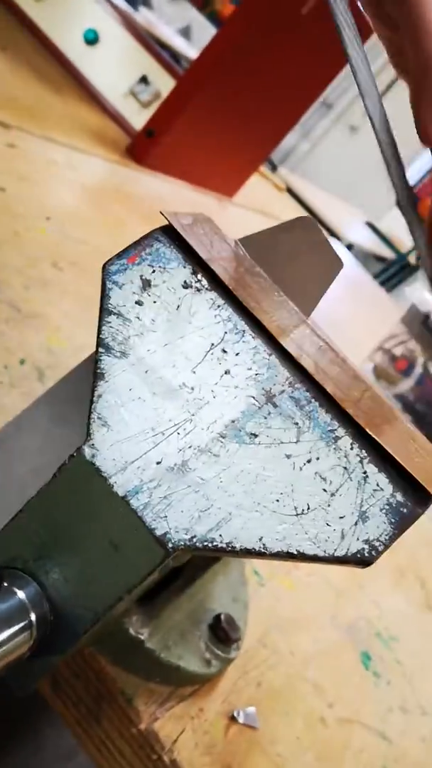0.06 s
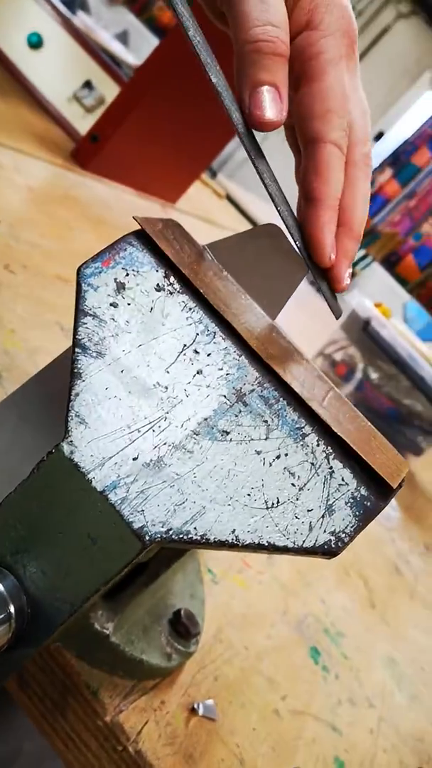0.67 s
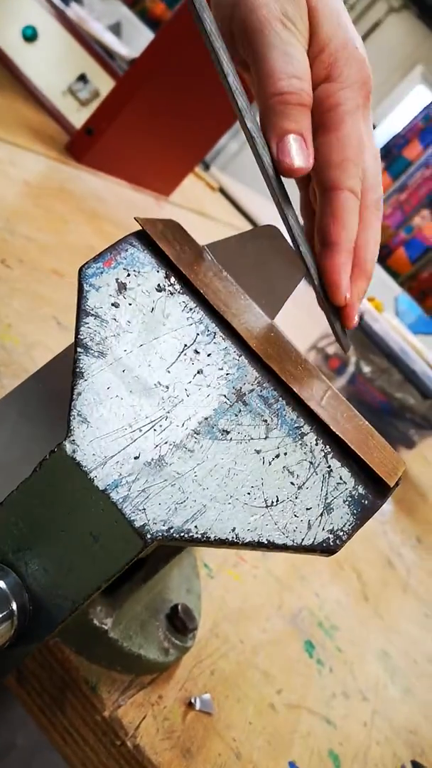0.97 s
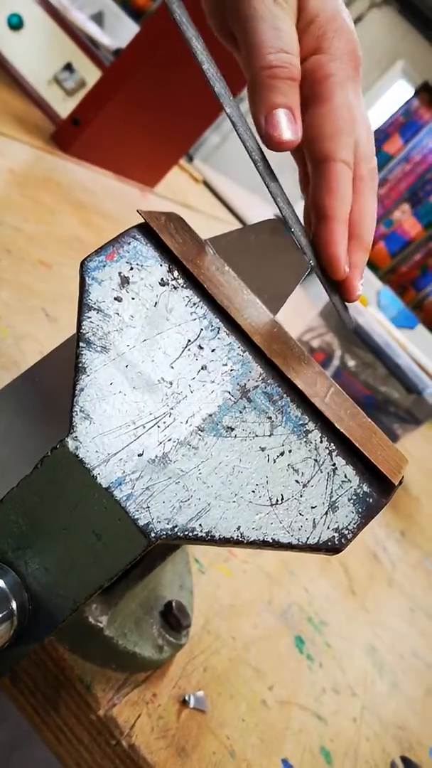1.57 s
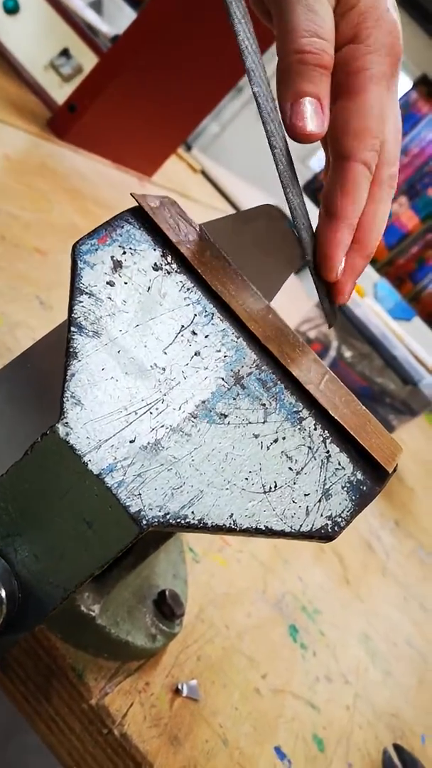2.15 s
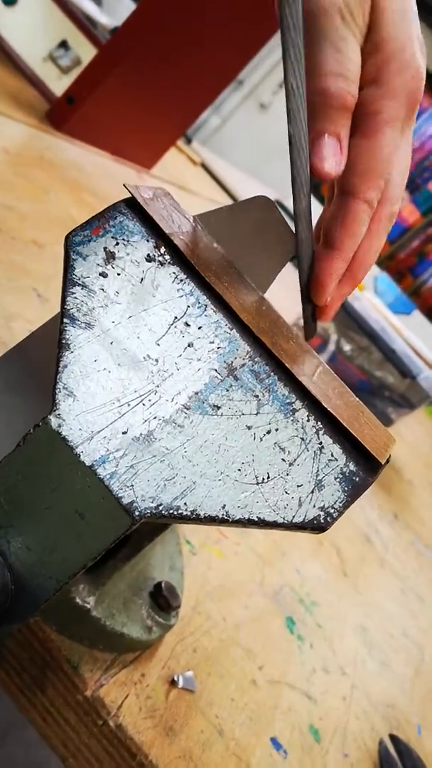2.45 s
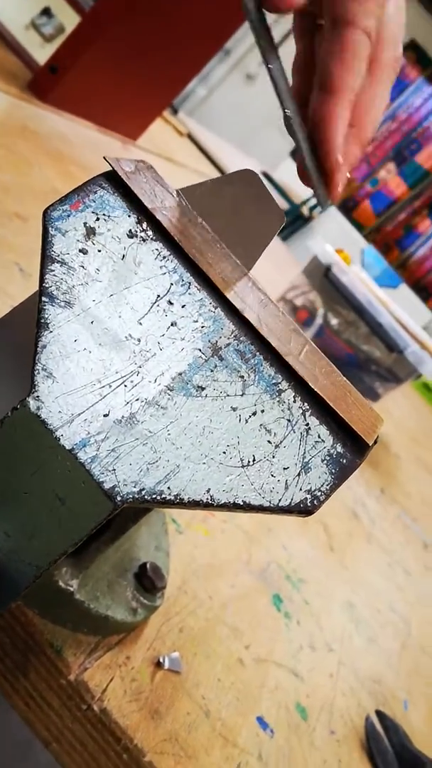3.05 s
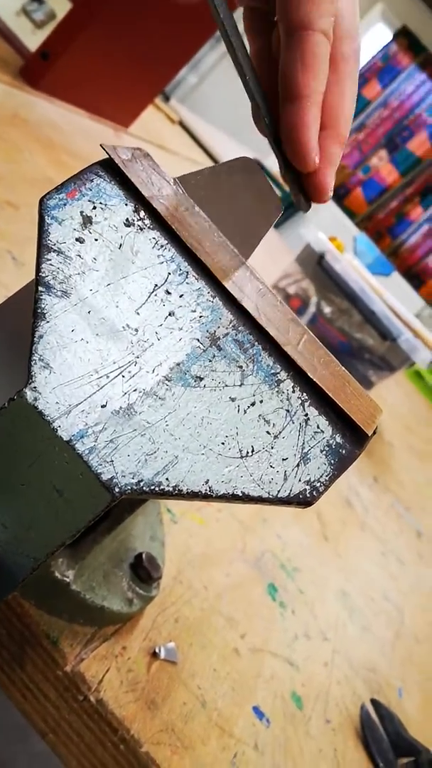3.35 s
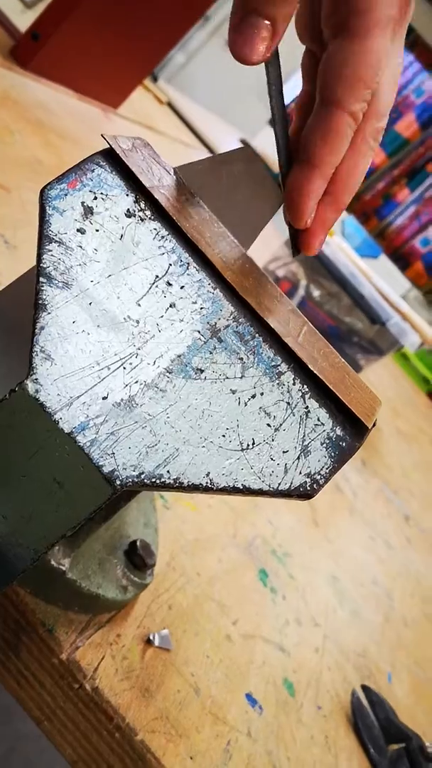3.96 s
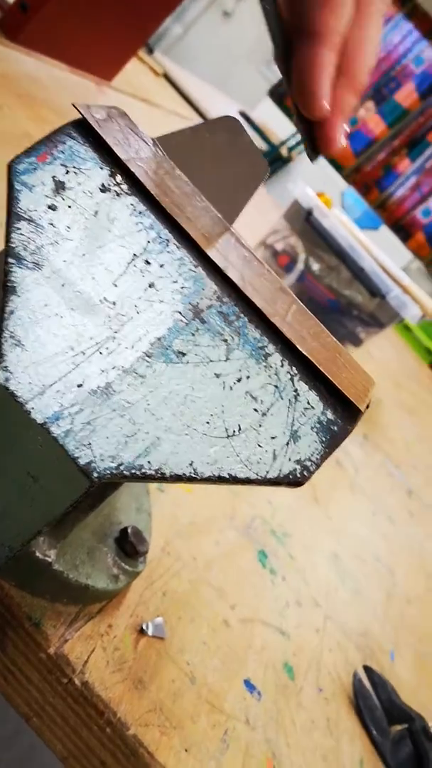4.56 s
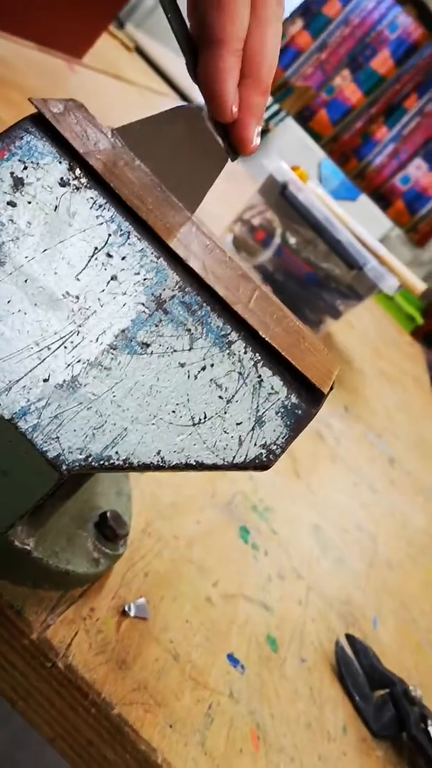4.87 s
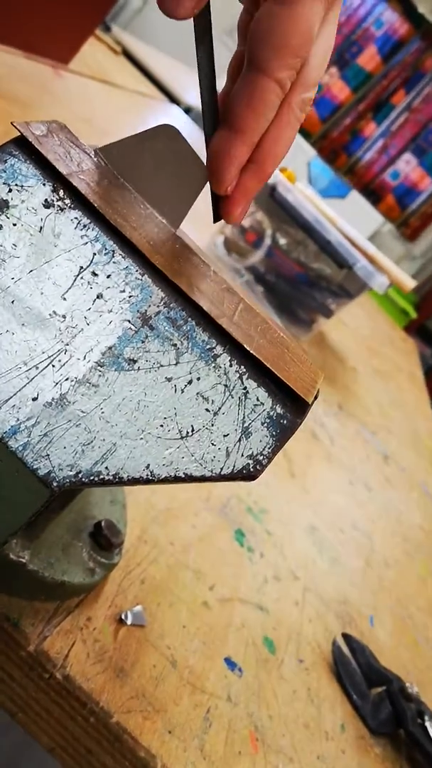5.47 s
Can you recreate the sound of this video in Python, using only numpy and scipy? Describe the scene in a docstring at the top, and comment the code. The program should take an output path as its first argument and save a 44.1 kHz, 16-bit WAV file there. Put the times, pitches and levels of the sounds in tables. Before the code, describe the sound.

A hand file works unevenly on thin sheet metal in a bench vise, close and slightly to the left, in a workshop with short reverberation. After a soft, muffled rub, a sharp metallic tap rings briefly at 0.5 seconds. Faint sliding leads to a clicking bite at 1.2 seconds, a light tap, and a ringing clink with a short, juddering rasp at 1.7. The strongest knock and rasp come around 2.4 seconds, with teeth snagging on the edge. A bright tap follows at 3.4, then light, brief file strokes between 3.7 and 4.6, and another clink at 4.7. Something heavier scrapes twice, dull at 5.2 seconds and brighter at 5.5, followed by a last faint rasp. Soft, low bumps from the rocking bench accompany the pushes. Faint room air and a low electrical hum continue underneath.

```python
"""Filing sheet metal in a vise

A hand file taps, slides and bites in short uneven strokes, close by in a workshop. Its teeth act as
an impulse train that excites the modes of sheet and blade, while each push rocks the bench. Near the
end something heavier scrapes twice by stick-slip, dull and then bright, over faint air and mains hum."""
import sys
import numpy as np
from scipy import signal
from scipy.fft import rfft, irfft
from scipy.io import wavfile
from scipy.ndimage import uniform_filter1d

SR = 44100
rng = np.random.default_rng(int(sys.argv[2]) if len(sys.argv) > 2 else 0)


def wav_record(signal):
    """Record a signal, one row per channel, as 16-bit PCM in the file named by sys.argv[1]."""
    frames = np.transpose(np.atleast_2d(signal))
    bounded = np.clip(frames, -1, 1)
    # unit amplitude maps onto the largest positive 16-bit level
    quanta = np.round(bounded * 32767).astype(np.int16)
    wavfile.write(sys.argv[1], SR, quanta)


N = 252693
T = np.arange(N) / SR

# modes of the clamped sheet and of the file blade: f/Hz, level/dB, T60/s
SHEET_MODES = [(691, -3.5, 0.21), (1143, 0.5, 0.042), (1370, 0, 0.13), (1495, 8, 0.064),
               (1575, -2.5, 0.023), (1829, 1.5, 0.06), (1950, 0, 0.071), (2050, 8.5, 0.022),
               (2295, 0, 0.18), (2610, 3.5, 0.083), (3430, -0.5, 0.017), (3830, -8, 0.063),
               (4860, -3, 0.032), (5360, 10, 0.051), (5770, -33, 0.04)]
BLADE_MODES = [(1226, 8, 0.072), (1819, 10.5, 0.069), (3390, 8.5, 0.013), (4140, 7, 0.014),
               (7130, 7, 0.038), (7400, 7, 0.006)]
# spectra of the rasp and of a snagging tooth: f/Hz, level/dB
RASP_SPECTRUM = [(150, -36), (250, -26), (308, -7), (474, -14), (669, -2.5), (900, -6), (1070, -8),
                 (1250, 1), (2300, 1.5), (3390, -10.5), (3890, -13.5), (7130, -18.5), (12600, -31.5),
                 (15500, -48)]
SNAG_SPECTRUM = [(500, -30), (2300, -0.5), (3600, 3.5), (5000, 4), (8500, -24), (12500, -16), (15000, -18)]
# file strokes: t/s, hold/s, rise/s, level/dB, swell/dB, low grind/dB, treble/dB, blade/dB,
# contact f/Hz, contact/dB, contact glide/1, sheet ringing/dB (the parts relative to the rasp)
FILE_STROKES = [(0.828, 0.064, 0.043, -69, 4, -9, -8, -17, 1920, 4, 0.074, -13),
                (0.912, 0.26, 0.061, -58.5, 1, -6, 2.5, -7, 1710, -0.5, 0.0092, -23),
                (1.178, 0.0097, 0.026, -34, -6.5, 2.5, -2, -36, 2470, -11, -0.049, -20),
                (1.207, 0.074, 0.019, -51.5, -5, 5.5, -23, -9, 940, 3.5, 0.036, -19),
                (1.727, 0.05, 0.022, -42.5, -2.5, 1.5, -5, 4, 1640, -9, 0.023, -24),
                (1.811, 0.067, 0.03, -59, -18, 11.5, -7, -22, 810, 5, -0.083, -18),
                (2.199, 0.16, 0.046, -70.5, 4, -33, -4.5, -16, 1890, 2, 0.27, -21),
                (2.449, 0.098, 0.085, -40.5, -2.5, 1, -1.5, -17, 3600, -9, 0.15, -12),
                (2.72, 0.012, 0.027, -53, -7, 6.5, -4, -3.5, 2140, 2, 0.14, -22),
                (2.75, 0.027, 0.035, -62, -26, 1, -54, -28, 870, 16.5, -0.0027, -15),
                (3.06, .12, 0.071, -74, -5.5, -21, -7, -17, 2680, 2, -0.35, -18),
                (3.737, 0.03, 0.058, -52, -1.5, 2.5, 3.5, -26, 1450, -0.5, 0.2, -25),
                (4.085, .025, .08, -57.5, -1.5, -3, 0, -27, 2140, -0.5, 0.084, -26),
                (4.253, 0.023, 0.091, -63.5, -7, 2, 2, -35, 2230, -3, 0, -19),
                (4.494, 0.15, 0.15, -70.5, -4.5, -24, 10, -21, 2390, 6, -0.031, -17),
                (4.969, 0.02, 0.07, -68, 2.5, -13, 3, -20, 2200, -22, 0.02, -29),
                (5.629, 0.092, 0.037, -62, 7, -10, -3, -10.5, 1180, -10, 0.15, -8)]
JUDDER_HZ = 184.1  # rate at which the file skips over the edge
def filing(low_hz=1000, high_hz=4500, slowing_db=6, max_judder_db=29, snags_per_s=110, snag_db=-6):
    """Forced vibration: tooth impacts drive the sheet, the blade and a gliding contact resonance."""
    out = np.zeros(N)
    for (s, hold_s, rise_s, db, swell_db, grind_db, treble_db, blade_db,
         contact_hz, contact_db, glide, ring_db) in FILE_STROKES:
        sheet = struck_body(colour(RASP_SPECTRUM), perturbed(SHEET_MODES), ring_db)
        rasp = unit_energy(band(sheet, [low_hz, high_hz], "bandpass"))
        grind = unit_energy(band(sheet, low_hz, "lowpass"))
        treble = unit_energy(band(sheet, high_hz, "highpass"))
        blade = ring(BLADE_MODES)
        start, progress, force = stroke(s, hold_s, rise_s, db, swell_db)
        skip_phase = np.cumsum(JUDDER_HZ * (1 + 0.13 * wander(70, len(force)))) / SR % 1
        judder_db = max_judder_db * min(amp(blade_db), 1)  # a ringing blade skips harder
        judder = unit_rms(amp(-judder_db * skip_phase))
        drive = teeth(len(force), per_s=620, uneven_db=4.5, grit=0.62) * judder
        digging_db = grind_db + slowing_db * (progress - .5)  # more grind as the file digs in
        for response, part_db in [(rasp, 0), (grind, digging_db), (treble, treble_db), (blade, blade_db)]:
            add(out, start, signal.fftconvolve(drive * force * amp(part_db), response))
        contact = resonate(drive, contact_hz * (1 + glide * progress), width_hz=520)
        add(out, start, amp(contact_db) * force * unit_rms(contact))
        snags = unit_rms(1. * (rng.random(len(force)) < snags_per_s / SR))
        add(out, start, amp(snag_db) * signal.fftconvolve(snags * force, colour(SNAG_SPECTRUM)))
    return out


def teeth(count, per_s, uneven_db, grit):
    """Jittered impulse train: teeth catch at unsteady speed and force over the hiss of fine chips."""
    passed = np.cumsum(per_s * np.exp(.3 * wander(90, count))) / SR
    caught = np.diff(np.floor(passed), prepend=0) > 0
    pulses = caught * amp(uneven_db * np.clip(rng.standard_normal(count), -2, 2))
    return unit_rms(unit_rms(pulses - pulses.mean()) + grit * rng.standard_normal(count))


def stroke(s, hold_s, rise_s, db, swell_db, depth_db=26, release_s=.05):
    """Force envelope: contact builds, holds and lets go. Gives start time, progress 0-1 and gain."""
    t = np.arange(-rise_s, hold_s + release_s, 1 / SR)
    progress = np.clip(t / hold_s, 0, 1)
    lifted = np.maximum(-t / rise_s, 0) + np.maximum((t - hold_s) / release_s, 0)
    return s - rise_s, progress, amp(db + swell_db * progress - depth_db * lifted)


def perturbed(modes, detune=0.0095, uneven_db=3):
    """Contact loading: each new point of contact detunes and reweights the modes."""
    chance = rng.standard_normal((len(modes), 2))
    return [(hz * (1 + detune * shift), db + uneven_db * weight, t60)
            for (hz, db, t60), (shift, weight) in zip(modes, chance)]


# spectrum of the contact click: f/Hz, level/dB
CLICK_SPECTRUM = [(200, -27), (480, -7), (720, -7.5), (1100, -1.5), (1700, -1), (3500, -0.5), (5500, -2.5),
                  (8000, -11.5), (10000, -19), (15000, -35)]
# modes of the vise: f/Hz, level/dB, T60/s
VISE_MODES = [(830, 0.5, 0.19), (905.6, -4, 0.28), (1170, -0.5, 0.12), (1890, -0.5, 0.26), (2950, -1, 0.12),
              (4900, -18, 0.12)]
# knocks: t/s, level/dB, favoured f/Hz, spread/octave, ringing/dB, click tilt/(dB/octave), vise/dB
FILE_TAPS = [(0.366, -39.5, 2530, 0.38, 12, -5, -37), (0.484, -1.5, 1870, 0.44, 0.5, 0.5, -17.5),
             (0.775, -29, 2030, 0.67, -1, -3, -31), (1.183, -7.5, 1480, 1, 0, -3, -35),
             (1.556, -18.5, 1760, 0.17, -1, -4, -28), (1.729, -6.5, 1790, 0.073, 15, -2, -13),
             (2.438, 0, 2120, 0.99, -1, -1, -17), (2.725, -38, 2220, 0.29, 3, -8, -17),
             (3.393, -4, 4180, 0.59, -4, 0, -7.5), (4.279, -26, 870, 0.38, -6, -9.5, -5),
             (4.6945, -7.5, 1470, 0.11, 6, -1.5, -19)]
def taps(favour_db=18, blade_db=-5, chatter_s=0.0014, rattle_depth=0.95, size=900):
    """Impact excitation: a knock favours the modes that move most at the point of contact."""
    out, t = np.zeros(N), np.arange(size) / SR
    sheet_and_blade = SHEET_MODES + [(hz, level + blade_db, t60) for hz, level, t60 in BLADE_MODES]
    for s, db, favoured_hz, spread, ring_db, tilt_db, vise_db in FILE_TAPS:
        modes = [(hz, level + favour_db * np.exp(-(np.log2(hz / favoured_hz) / spread) ** 2), t60)
                 for hz, level, t60 in perturbed(sheet_and_blade, detune=0.0054, uneven_db=5)]
        force = 0.3 * rng.standard_normal(size) * np.exp(-t / chatter_s)
        force[0] = 1  # the impact itself, ahead of its chatter
        response = struck_body(colour(CLICK_SPECTRUM, tilt_db), modes, ring_db)
        knock = signal.fftconvolve(whiten(force, bins=5), response)
        onset = np.minimum(np.arange(len(knock)) / size, 1)
        rattle = 1 + rattle_depth * wander(165, len(knock)) * onset  # file on the ringing sheet
        add(out, s, amp(db) * knock * rattle)
        add(out, s, amp(db + vise_db) * ring(VISE_MODES))
    return out


# teeth hooking on the edge: t/s, skid length/s, level/dB, f/Hz
TOOTH_CATCHES = [(1.1765, 0, -30, 3000), (1.1801, 0, -18, 2710), (1.1844, 0.00078, -13.5, 2880),
                 (1.699, 0.0096, -34.5, 3740), (1.7288, 0.033, -16, 3390), (1.768, 0, -12.5, 3700),
                 (1.776, 0.017, -20, 3940), (2.438, 0.0049, -12, 3600), (2.458, 0.006, -14.5, 4000),
                 (2.509, 0.00034, -19, 4500), (2.528, 0.00029, -20, 4730), (2.555, 0, -10.5, 3460),
                 (3.732, 0, -24, 4370), (4.695, 0, -17, 4060)]
def catches(decay_s=0.00061, overtone_ratio=2.15, overtone_db=-6, crack_db=-6, uneven_db=3, size=600):
    """Elastic release: a hooked tooth snaps free with a crack and a brief ring, repeatedly in a skid."""
    out, t = np.zeros(N), np.arange(size) / SR
    crack = amp(crack_db) * colour(SNAG_SPECTRUM)[:size]
    for s, skid_s, db, hz in TOOTH_CATCHES:
        for delay in np.arange(0, max(skid_s, 1 / SR), 1 / JUDDER_HZ):
            shift, weakness = rng.standard_normal(2)
            phase = 2 * np.pi * hz * (1 + .03 * shift) * t
            partials = np.sin(phase) + amp(overtone_db) * np.sin(overtone_ratio * phase)
            snap = unit_energy(np.exp(-t / decay_s) * partials)
            add(out, s + delay, amp(db - uneven_db * weakness) * unit_energy(snap + crack))
    return out


# squeaks of the teeth, and a faint ring after the stroke at 1.9 s: t/s, length/s, level/dB, f/Hz
SHORT_TONES = [(1.757, 0.033, -43, 6900), (1.901, 0.016, -52, 1400), (2.719, 0.012, -53, 7080)]
def short_tones(relative_width=0.068, waver=0.017):
    """Noise in a narrow, wavering resonance gives a short, rough tone: a friction squeal, or a faint ring after
    a stroke."""
    out = np.zeros(N)
    for s, length_s, db, hz in SHORT_TONES:
        progress = np.linspace(0, 1, int(length_s * SR))
        noise = rng.standard_normal(len(progress))
        tone = resonate(noise, hz * (1 + waver * wander(180, len(noise))), relative_width * hz)
        add(out, s, amp(db) * unit_rms(tone * np.sqrt(4 * progress * (1 - progress))))
    return out


# spectra of the dull and of the bright scrape: f/Hz, level/dB
DULL_SPECTRUM = [(59, -39), (100, -34), (125, -14), (157, 1.5), (238, -6.5), (292, -0.5), (388, -11),
                 (520, 3), (790, -10.5), (1110, 3), (1270, -4.5), (1850, -5.5), (2500, -12), (2800, -17),
                 (3050, -32), (3650, -27), (4600, -42), (9000, -41), (11700, -54), (19800, -120)]
BRIGHT_SPECTRUM = [(200, -24.5), (520, -5), (760, -16.5), (1100, -4.5), (1400, -12.5), (2600, -5.5),
                   (3150, -15), (3800, -13), (6000, -18.5), (8500, -27), (10500, -40.5), (15000, -51)]
# modes of the heavier body: f/Hz, level/dB, T60/s
HEAVY_MODES = [(500, -12, 0.49), (544, -21, 0.35), (618, -7.5, 0.37), (1110, 8, 0.22), (1146, 4, 0.082),
               (1357, -6, 0.19), (1843, 1, 0.07)]
# scrapes: t/s, hold/s, rise/s, level/dB, swell/dB, ringing/dB, first grab/dB
HEAVY_SCRAPES = [(5.163, .172, .005, -31, -9, -11.5, -13.5), (5.499, .1, .018, -38, -4, -6.5, -16)]
def scrapes(grab_hz=1730, grab_s=0.029):
    """Stick-slip friction shakes a heavier body; a broad resonance swells as it first grabs."""
    out = np.zeros(N)
    for row, spectrum in zip(HEAVY_SCRAPES, [DULL_SPECTRUM, BRIGHT_SPECTRUM]):
        s, hold_s, rise_s, db, swell_db, ring_db, grab_db = row
        start, _, force = stroke(s, hold_s, rise_s, db, swell_db)
        drive = teeth(len(force), per_s=400, uneven_db=2.5, grit=1.0)
        response = struck_body(colour(spectrum), HEAVY_MODES, ring_db)
        add(out, start, signal.fftconvolve(drive * force, response))
        age = np.arange(len(force)) / SR / grab_s
        grab = (age * np.exp(1 - age)) ** 2 * unit_rms(resonate(drive, grab_hz, width_hz=650))
        add(out, start, amp(grab_db) * force * grab)
    return out


# shoves on the bench: t/s, level/dB
BENCH_SHOVES = [(0.841, -46.5), (.96, -46), (1.1, -49), (1.24, -43.5), (1.57, -50), (1.739, -58),
                (2.27, -48.5), (2.42, -46), (2.521, -41), (3.785, -39), (3.92, -56), (4.11, -51.5),
                (5.02, -60), (5.25, -44.5), (5.42, -51.5), (5.53, -43)]
def bench(sway_hz=87, rumble_hz=55, boards_hz=(220 / 1.82, 330), rise_s=0.063, decay_s=0.069):
    """Damped oscillation: each push rocks the bench in one low mode, with rumble and a dull knock."""
    push = sum(amp(db) * np.clip(1 + (T - s) / rise_s, 0, 1) * np.exp(-np.maximum(T - s, 0) / decay_s)
               for s, db in BENCH_SHOVES)
    cycles = np.cumsum(sway_hz * (1 + 0.129 * wander(60, N))) / SR
    sway = unit_rms(np.sin(2 * np.pi * cycles) * (1 + 0.38 * wander(40, N)))
    rumble = unit_rms(band(rng.standard_normal(N), rumble_hz, "lowpass"))
    boards = unit_rms(band(rng.standard_normal(N), boards_hz, "bandpass"))
    return push * (amp(-0.5) * sway + amp(-7) * rumble + amp(-15) * boards)


# muffled rubs: t/s, length/s, level/dB, f/Hz, width/Hz
MUFFLED_RUBS = [(0.085, 0.039, -54, 174, 90), (0.135, 0.15, -52, 179, 82), (0.78, 0.12, -59.5, 167, 90),
                (1.185, 0.13, -49.5, 320, 40.5), (1.499, 0.07, -50, 200, 77), (1.55, .13, -50.5, 178, 89.5)]
def rubs():
    """Friction noise in one low, broad resonance is heard as brief, muffled rubbing."""
    out = np.zeros(N)
    for s, length_s, db, hz, width_hz in MUFFLED_RUBS:
        count = int(length_s * SR)
        progress = np.linspace(0, 1, count)
        envelope = np.minimum(progress * 10, 1) * np.sqrt(1 - progress)
        noise = resonate(rng.standard_normal(2 * count), hz, width_hz)[count:]
        add(out, s, amp(db) * unit_rms(envelope * band(noise, hz + width_hz, "lowpass")))
    return out


# spectrum of the room air: f/Hz, relative level/dB
AIR_SPECTRUM = [(12, -34), (20, 8.5), (103, -3.5), (148, -7), (207, -9.5), (245, -16), (306, -15.5),
                (352, -19), (439, -23.5), (985, -24.5), (1820, -19.5), (4430, -30.5), (7520, -33),
                (14300, -41), (15500, -38)]
def room_air(level_db=-58.5):
    """Diffuse noise: the two ears are coherent only at long wavelengths."""
    hz = np.fft.rfftfreq(N, 1 / SR)
    left, independent = rfft(rng.standard_normal((2, N)))
    coherence = lookup([(100, 0.99), (300, 0.44), (800, 0.016), (8000, 0.019)], hz)
    right = coherence * left + np.sqrt(1 - coherence ** 2) * independent
    air = irfft(np.array([left, right]) * amp(lookup(AIR_SPECTRUM, hz)), N)
    return amp(level_db) * unit_rms(air)


# partials of the hum: f/Hz, level/dB
HUM_PARTIALS = [(50, -69), (99.5, -65), (200, -74.5), (299, -76)]
def mains_hum():
    """Near-harmonic series on the mains frequency, each partial drifting slightly in phase."""
    return sum(amp(db) * unit_rms(np.sin(2 * np.pi * hz * T + 0.11 * wander(7.4, N)))
               for hz, db in HUM_PARTIALS)


# reverberation time of the room: f/Hz, T60/s
ROOM_T60 = [(100, 0.42), (400, 0.72), (900, 0.57), (2000, 0.45), (4000, 0.4), (8000, 0.36), (15000, 0.37)]
# level difference of the near sound, left over right: f/Hz, level/dB
LEFT_EXCESS = [(100, -2.5), (500, 0.5), (1200, 7.5), (2200, 3), (4200, 8), (8000, 9.5), (14000, 1)]
def workshop(x, early_db, tail_db, right_lag_s, early_s=0.0031, build_s=0.0077, size=30000):
    """Reverberation: the near sound is earlier and louder on the left; the diffuse tail is even."""
    t = np.arange(size) / SR
    early, late = rng.standard_normal((2, 2, size)) * (rng.random((2, 2, size)) < .12)  # sparse echoes
    near = amp(early_db) * unit_energy(early * np.exp(-t / early_s) * (t > .0005))  # off vise and bench
    near[[0, 1], [0, round(right_lag_s * SR)]] += 1  # direct sound
    lean_db = np.outer([.5, -.5], lookup(LEFT_EXCESS, abs(np.fft.fftfreq(size, 1 / SR))))
    near = irfft(rfft(whiten(near)) * rfft(minimum_phase(lean_db)), size)
    hz, age_s, spectra = signal.stft(late * np.clip(t / build_s, 0, 1), SR, nperseg=256)
    decay = amp(-60 * age_s / lookup(ROOM_T60, hz)[:, None])
    tail = signal.istft(spectra * decay, SR, nperseg=256)[1][:, :size]
    response = (near + amp(tail_db) * unit_energy(tail)) / np.hypot(1, amp(tail_db))
    return signal.oaconvolve(x[None], response, axes=1)[:, :N]


def ring(modes, size=12000):
    """Modal superposition: an impulse response of damped sinusoids with alternating signs."""
    t = np.arange(size) / SR
    return unit_energy(sum((-1) ** k * amp(db - 60 * t / t60) * np.sin(2 * np.pi * hz * t)
                           for k, (hz, db, t60) in enumerate(modes)))


def struck_body(click, modes, ring_db):
    """Impulse response: a contact click and the free vibration that it starts."""
    out = amp(ring_db) * ring(modes)
    add(out, 0, click)
    return unit_energy(out)


def resonate(x, hz, width_hz):
    """Heterodyne resonator that can glide: shifts hz down to zero, smooths twice and shifts back."""
    carrier = np.exp(2j * np.pi * np.cumsum(hz * np.ones(len(x))) / SR)
    pole = np.exp(-np.pi * width_hz / SR)
    baseband = signal.lfilter([(1 - pole) ** 2], [1, -2 * pole, pole * pole], x / carrier)
    return 2 * (carrier * baseband).real


def colour(spectrum, tilt_db=0, size=2048):
    """Impulse response with the given spectrum, tilted by tilt_db per octave."""
    hz = abs(np.fft.fftfreq(size, 1 / SR))
    return unit_energy(minimum_phase(lookup(spectrum, hz) + tilt_db * np.log2((hz + 100) / 3000)))


def minimum_phase(db):
    """Causal impulse response from a two-sided level spectrum, by the Hilbert transform."""
    log_gain = np.log(amp(np.maximum(db, -100)))
    return np.fft.ifft(np.exp(np.conj(signal.hilbert(log_gain)))).real


def whiten(response, bins=240):
    """Inverse filtering removes the broad colour of a set of echoes and keeps their fine comb."""
    spectrum = np.fft.fft(response)
    smooth_db = 10 * np.log10(uniform_filter1d(abs(spectrum) ** 2, bins, mode="wrap") + 1e-12)
    return unit_energy(np.fft.ifft(spectrum * np.fft.fft(minimum_phase(-smooth_db))).real)


def band(x, hz, kind):
    """Butterworth filter."""
    return signal.sosfilt(signal.butter(4, hz, kind, fs=SR, output="sos"), x)


def wander(hz, count):
    """Random modulation of rms 1, with hz new values a second."""
    knots = rng.standard_normal(4000)
    return unit_rms(np.interp(np.arange(count) * hz / SR, np.arange(len(knots)), knots))


def lookup(points, hz):
    """Interpolation on a log-frequency axis."""
    f, value = np.transpose(points)
    return np.interp(np.log(hz + 1), np.log(f + 1), value)


def amp(db):
    """Decibels to gain."""
    return 10 ** (np.asarray(db) / 20)


def unit_rms(x):
    """Scales to rms 1."""
    return x / np.sqrt(np.mean(x ** 2) + 1e-20)


def unit_energy(x):
    """Scales each channel to energy 1."""
    return x / np.sqrt(np.sum(x ** 2, -1, keepdims=True) + 1e-20)


def add(mix, s, sound):
    """Mixes a sound in at time s."""
    part = mix[max(round(s * SR), 0):][:len(sound)]
    part += sound[:len(part)]


def scene():
    """Superposition: the metal sounds in the room, over the low bench sounds and the background."""
    rasp = workshop(filing() + short_tones(), early_db=14, tail_db=-4.5, right_lag_s=.00032)
    knocks = workshop(taps(), early_db=9.5, tail_db=-1.5, right_lag_s=.00032)
    snaps = workshop(catches(), early_db=0.5, tail_db=-6, right_lag_s=.00032)
    heavy = workshop(scrapes(), early_db=9, tail_db=-4.5, right_lag_s=.00047)
    heavy *= amp([[-1], [1]])  # nearer the middle
    return rasp + knocks + snaps + heavy + bench() + rubs() + room_air() + mains_hum()


def record(dry):
    """Band limiting: a linear-phase low-pass at 15.5 kHz."""
    lowpass = signal.firwin(511, 15500, window=("kaiser", 9), fs=SR)
    return signal.oaconvolve(dry, lowpass[None], "same")


dry = scene()
out = record(dry)
wav_record(out)
```